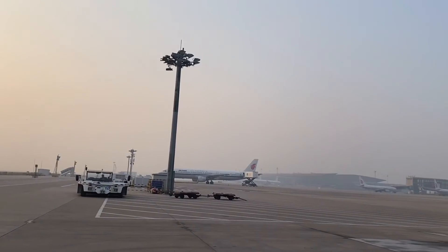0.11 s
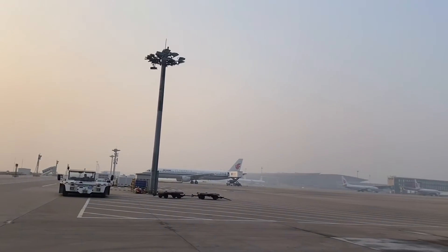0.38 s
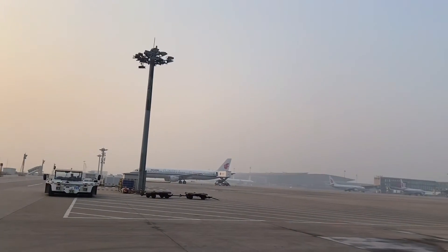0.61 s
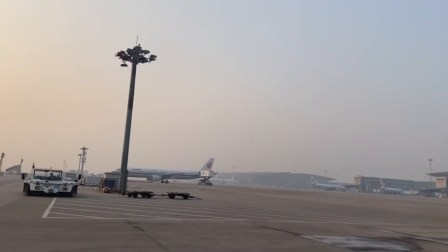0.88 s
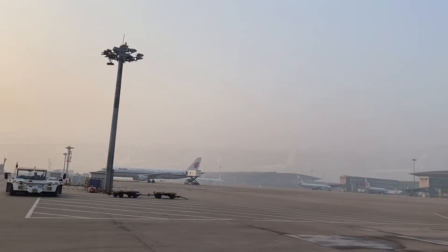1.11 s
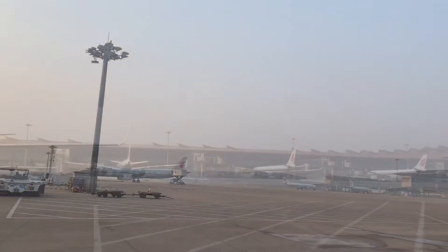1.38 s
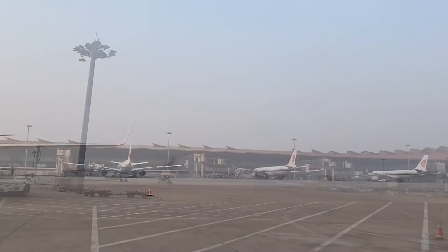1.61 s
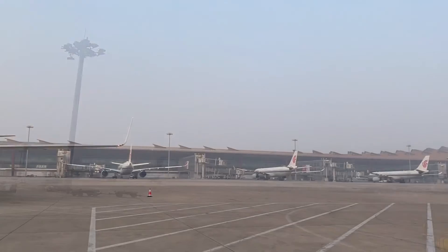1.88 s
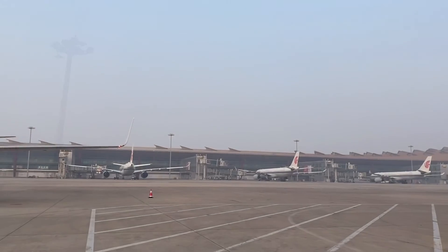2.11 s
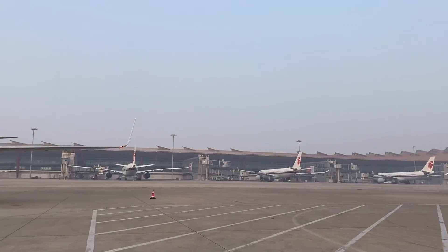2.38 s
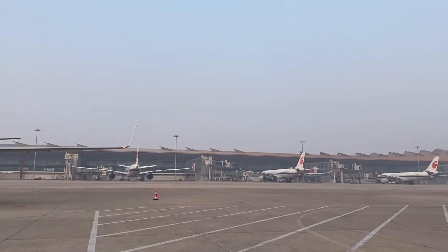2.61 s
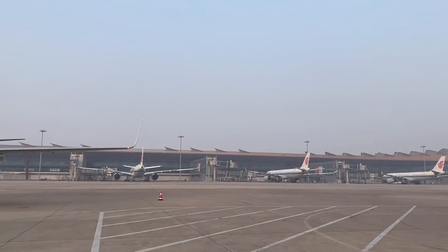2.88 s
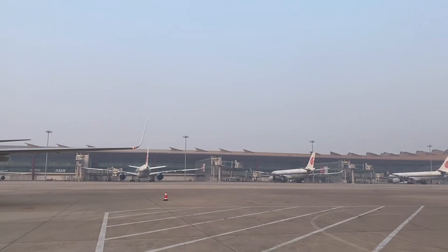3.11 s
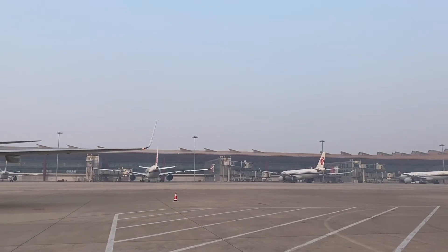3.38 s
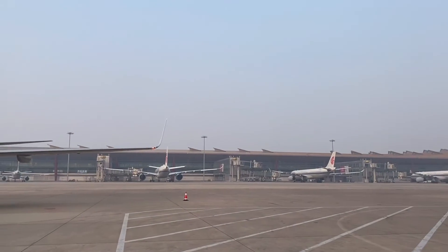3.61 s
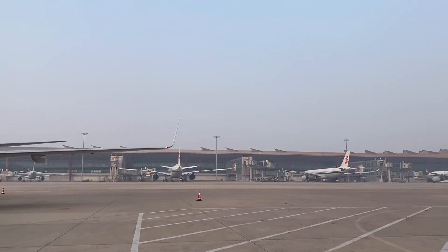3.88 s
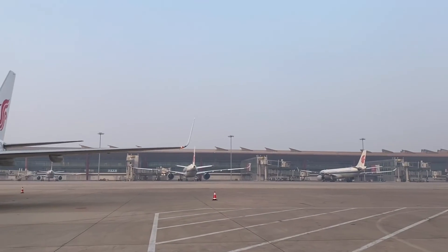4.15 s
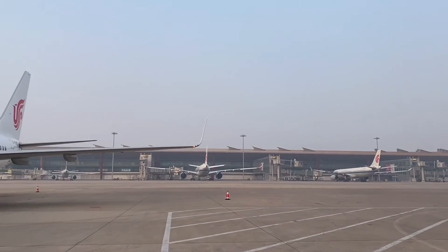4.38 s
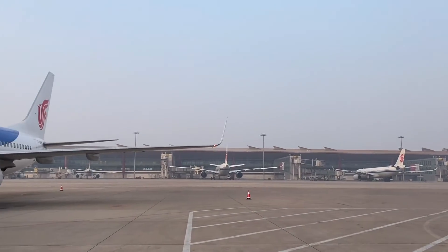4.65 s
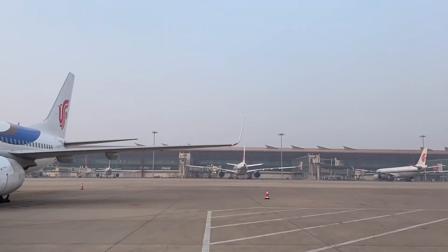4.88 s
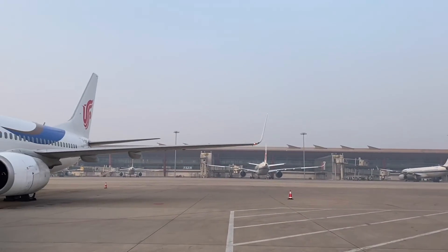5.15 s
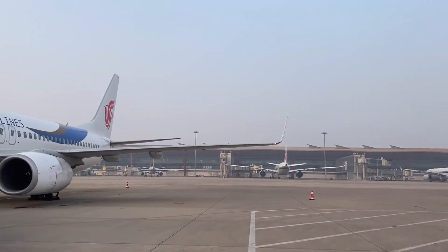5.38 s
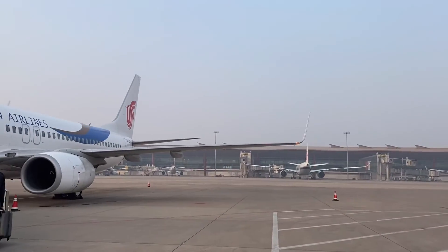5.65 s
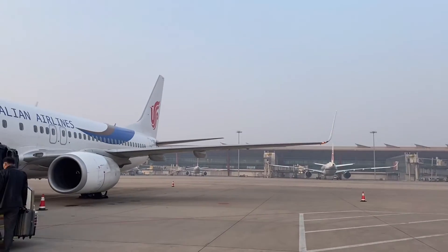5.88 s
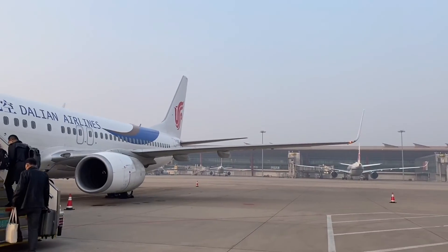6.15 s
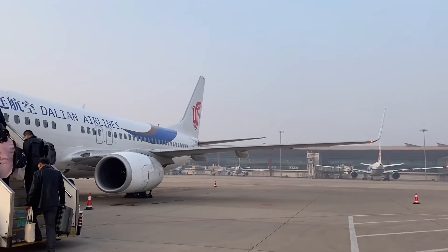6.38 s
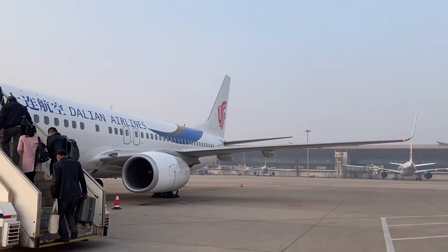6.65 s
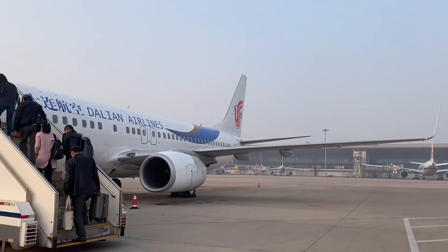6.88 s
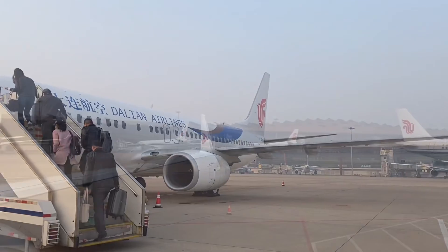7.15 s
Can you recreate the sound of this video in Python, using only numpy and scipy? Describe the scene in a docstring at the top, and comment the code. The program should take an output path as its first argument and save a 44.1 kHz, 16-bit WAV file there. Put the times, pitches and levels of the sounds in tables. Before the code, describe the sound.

From 0 s, already at full level, a wide stereo bed of low engine rumble and rough roar, with diesel knocks, a wavering mid-low hum that briefly dips, small low wind-like flutters and a weak pump whine. At about 1.1 s it cuts abruptly to near silence, then fades up until about 2.9 s: a smoother roar, low drone and clearer steady whine near 590 Hz, wavering in level, with thin high whistles. Bright tiny ticks of a hand on the phone come at 2.1 and 2.3 s, and a dull double thump at 3.1 s. Around 4 to 6 s a hissy jet band swells and glides slightly lower; faint ticks at 4.2 and 4.9 s. After 5 s the drone thins. Faint ticks and airy puffs follow at 6.3 and 6.6 s. At 6.9 s, a sudden drop to near silence, barely rising by 7.3 s.

```python
"""First a full rumble and roar of engines with an unsteady hum: an airport apron at dawn, from three spots in turn.
The roar is band-filtered noise, part shared by the ears and part opposed, with ringing notes and diesel knocks.
Sine tones give a pump with overtones, a turbine whistle with its octave, high ground power and low engine notes.
Enveloped noise and short sines give puffs, thumps, flutters and ticks of the hand on the phone.
The second and third spots cut in almost silent and fade up."""
import sys
import numpy as np
from scipy import signal
from scipy.fft import rfft, irfft
from scipy.io import wavfile
from scipy.ndimage import uniform_filter1d

SR = 44100
rng = np.random.default_rng(int(sys.argv[2]) if len(sys.argv) > 2 else 0)


def master_out(mix):
    """Clip the mix to full scale and print it as 16-bit PCM to the path in sys.argv[1]."""
    frames = np.transpose(np.atleast_2d(mix))
    ceiling = np.clip(frames, -1, 1)
    pcm = np.round(ceiling * 32767).astype(np.int16)
    wavfile.write(sys.argv[1], SR, pcm)


def how_loud(loudness_db):
    """Turn decibels into a plain amplitude multiplier (0 dB gives 1, 20 dB gives 10)."""
    steps = np.asarray(loudness_db, float) / 20
    return 10 ** steps


N = 320166
T = np.arange(N) / SR
F = np.fft.rfftfreq(N, 1 / SR)
EAR_SIGNS = np.array([[1], [-1]])  # left, right

# Levels hold before the fade at each spot. Every "length" of a swell, dip, puff, flutter or thump, and every
# swell's width, is two standard deviations of a Gaussian; a puff's width is that of a resonance.

# where one spot ends and the next begins: [t/s]
SPOT_CUTS_S = [1.0885, 6.918]
# bands of the roar, from rumble up to air: [lower f/Hz, upper f/Hz]
BAND_HZ = [
    [30, 180],
    [180, 550],
    [640, 1000],
    [1000, 2000],
    [2000, 3100],
    [3100, 4600],
    [4600, 7500],
    [9600, 12500],
]
# relative colour of the roar shared by both ears, first spot then later: [f/Hz, density/dB per Hz]
SHARED_COLOUR = [
    [(15, -48), (25, -35), (40, -10), (54, -6.5), (123, -2.5), (279, -12.5), (370, -16), (431, -17),
     (500, -25), (848, -32.5), (1550, -34), (2640, -31), (3500, -35), (4590, -32), (8000, -50.5),
     (12000, -57.5), (16000, -63)],
    [(15, -40), (25, -25), (36, -22), (47, -5.5), (92, -4), (199, -7.5), (373, -8), (500, -13),
     (800, -18.5), (1550, -27.5), (2830, -29), (4380, -38), (6500, -51), (8000, -53), (12000, -51),
     (16000, -54)],
]
# relative colour of the roar opposed in the ears, first spot then later: [f/Hz, density/dB per Hz]
OPPOSED_COLOUR = [
    [(15, -45), (48, -13), (123, -8), (300, -7.5), (442, -11.5), (576, -10), (868, -22.5), (1310, -19),
     (2000, -25), (2830, -42), (3700, -28), (4600, -38), (6500, -41), (16000, -74)],
    [(15, -33), (40, -10), (88, -11), (194, -9.5), (300, -6), (600, -5.5), (1000, -15), (1750, -15.5),
     (2170, -25), (3000, -24), (4400, -36.5), (5570, -38.5), (6500, -60), (16000, -82)],
]
# offset added to the opposed colour, first spot then later: [level/dB]
OPPOSED_OFFSET_DB = [-6, -8]
# balance of the roar, first spot then later: [f/Hz, left minus right/dB]
EAR_BALANCE = [
    [(60, -2), (110, 0.5), (200, -3.5), (380, 2.5), (700, -4), (1290, -1.5), (2380, -2), (4400, 0),
     (8120, -1), (15000, 0.0)],
    [(60, 3), (110, -0.5), (200, 3), (380, 2), (700, 7.5), (1290, -0.5), (2380, 2), (4400, 3), (8120, 0),
     (15000, 3)],
]
# phase between the ears, as the roar reaches one port first, first spot then later: [f/Hz, left leads/rad]
EAR_LEAD = [
    [(250, 0.0069), (360, 1.8), (500, 0.5), (750, .5), (1200, -0.26), (1900, -0.58), (2500, 0.21)],
    [(140, 0.04), (230, .35), (300, 0.56), (400, -0.37), (520, -0.21), (750, -1.2), (1200, 0.36),
     (2200, -0.011)],
]
# low engine notes, noise ringing in ducts, first spot then later: [f/Hz, width/Hz, level against the roar/dB]
DUCT_NOTES = [
    [(66, 31, 8), (113, 38, 4.5), (134, 25, -4), (382, 9.6, -1), (416, 16, -6)],
    [(68, 8.4, 0), (101, 8, 7.5), (137.3, 6.5, -2.5), (259.4, 6.1, 4), (371.8, 6.8, 2.5)],
]
# casings ringing in the roar, first spot then later: [f/Hz, width/Hz, level against the roar/dB, before knocking]
CASINGS = [
    [(1250, 220, 6), (1870, 190, -3), (2720, 130, 0), (4540, 330, -2)],
    [(739, 55, -0.5), (2750, 290, -9.5), (3400, 670, -7.5), (6480, 240, 0.5)],
]
# steady level at each spot: [rumble, drone, low roar, mid roar, roar, jet, hiss, air; level/dB]
ROAR_SPOT_DB = [(-25.5, -32, -46.5, -47, -45, -53, -54.5, -65),
                (-25.5, -31, -42.5, -47.5, -48, -52, -57, -75.5),
                (-30, -32, -42.5, -41.5, -45.5, -47.5, -57, -75)]
# engines near and far swell or sink over part of the roar: [t/s, length/s, f/Hz, width/octaves, level/dB]
ROAR_SWELLS = [(.1, 0.63, 70, 1.6, -5.5), (1.4, 0.88, 70, 0.98, -4), (1.516, 0.61, 2720, 1.2, 4.5),
               (2.0, 1.7, 11000, 1.5, 3.5), (2.387, 0.49, 1020, 2.5, 4), (2.402, 0.42, 5800, 0.57, 3),
               (2.698, 1.35, 1670, 1.55, 3.5), (2.846, 0.95, 2200, 3, 0), (3.507, 1, 70, 1.4, -1.5),
               (3.3, 0.73, 5840, 1.1, 0.5), (4.3, 0.24, 5000, 1.5, 2), (4.595, 1.05, 402, 2, 0.5),
               (5.25, 0.76, 159, 0.86, 4), (6.452, 1.9, 1020, 2.2, -1), (6.55, 0.38, 2600, 0.33, 2),
               (6.6, 0.67, 3800, 0.61, -1.5), (6.75, 1.6, 10000, 1.34, 6)]
# slow swell of the whole roar, first spot then later: [rms level/dB]
GUST_DB = [.3, .92]
# the jet swings past as the phone turns: [t/s, left leads/rad, opposed part of the jet/dB]
JET_TURN = [(0, .3, 5.5), (1.1, .3, 3.5), (1.2, 1.8, -7), (3.2, 1.5, -7), (4.2, 0.31, -3.5),
            (5.0, 0.088, -6), (5.6, .1, -9), (6.2, 0.36, -3), (7.26, .3, 1)]
# edges of the jet's band: [f/Hz]
JET_HZ = (2700, 5600)

# steady tones, fundamentals and overtones: [f/Hz]
TONE_HZ = [591.9, 1183.5, 1775.5, 2849.5, 5702, 10401, 10800, 11201, 11451, 11751, 12001]
# one row a tone: [whine (0 pump, 1 turbine whistle, 2 ground power, 3 whistle's octave),
# level against that whine/dB, left minus right/dB, left leads at first spot/rad, left leads later/rad]
TONE_EARS = [(0, 1, 3.5, -2.1, 2.0), (0, -24.5, -2.5, 3.5, 4), (0, -21, -6, 7, 2), (1, 7, -3, -2, -5.5),
             (3, 0.5, 11, 8, 1), (2, -16, 0, 0, 3), (2, -8, 1, 0, -3.5), (2, -3, 3, -2, 0),
             (2, -11, 2, 0, -5), (2, -18, 2, 0, 0), (2, -12, 0, 0, 0)]
# steady level at each spot: [pump, turbine whistle, ground power, whistle's octave; level/dB]
WHINE_SPOT_DB = [(-46, -70, -67, -76), (-36, -71, -86, -74), (-40, -75, -84, -78)]
# echoes off aircraft and buildings cancel the pump whine for a while: [t/s, length/s, level/dB]
PUMP_FADES = [(1.04, .15, -1), (1.3, 0.32, -7), (2.0, 0.41, -5.5), (2.42, 0.2, -9), (3.46, 0.17, -8.5),
              (4.15, 0.23, -3), (4.5, 0.26, -7), (5.173, 0.2, -8), (5.55, 0.26, -2.5), (6.35, 0.19, -2)]
# changes in level of the turbine whistle: [t/s, length/s, level/dB]
WHISTLE_SWELLS = [(2.9, .8, -4), (4.05, 0.092, 13), (4.6, 0.27, 7.5), (6.598, 0.24, 9), (6.86, 0.14, 13.5)]
# the high thin tones grow louder for a while: [t/s, length/s, level/dB]
HIGH_TONE_SWELLS = [(1.75, .25, 8), (2.1, .2, 15), (2.38, .15, 14), (2.81, .2, 14), (6.7, .5, 5)]
# the whistle's octave grows louder for a while: [t/s, length/s, level/dB]
OCTAVE_SWELLS = [(1.5, .16, 13), (1.8, 0.28, 13), (2.8, 0.93, 5), (6.4, 0.94, 9)]
# random wander of each whine, in the order of the whines above: [rms level/dB]
WAVER_DB = [.9, 3.2, 2.1, 3.2]
# quick pitch jitter of each whine: [rms share of its f]
PITCH_JITTER = [0, .0009, 0, .00025]

# the hum drops away briefly: [t/s, length/s, level/dB]
HUM_FADES = [(0, .05, -8), (.265, 0.08, -13), (.38, .04, -6), (.65, .025, -8), (.77, .03, -9),
             (.91, .1, -7)]
# short puffs of roar: [t/s, length/s, f/Hz, width/Hz, peak rms level/dB]
PUFFS = [(2.72, 0.17, 2500, 1500, -50), (4.63, .12, 2980, 1500, -54), (6.29, 0.079, 2800, 1200, -50),
         (6.64, 0.029, 2700, 1500, -43), (6.909, 0.0089, 700, 1200, -32.5)]
# dull thumps through the floor: [t/s, length/s, f/Hz, envelope peak level/dB]
THUMPS = [(3.052, .016, 100, -19), (3.146, .007, 135, -11)]
# low flutters, opposite in the two ears, maybe wind on the ports: [t/s, length/s, peak rms level/dB]
FLUTTERS = [(.05, .08, -31), (.52, .08, -31), (.7, .08, -41), (1.05, .06, -39)]
# hand on the phone: [t/s, envelope level/dB, decay by 60 dB/s, body f/Hz, body level against envelope/dB]
TICKS = [(2.085, -46, .02, 4000, -6), (2.0874, -33, 0.007, 4000, -3), (2.093, -52, .03, 4100, 13),
         (2.2982, -37, .01, 4000, -3), (2.3006, -29, 0.008, 2500, -6), (2.3025, -40, .01, 4600, -9),
         (2.307, -42, 0.015, 6800, -9), (2.3135, -37, 0.018, 2250, 0), (2.3205, -42, .015, 6000, -12),
         (4.164, -58, .03, 7800, 3), (4.865, -54, 0.05, 2250, 19), (4.871, -52, 0.04, 2200, 18),
         (4.882, -58, .05, 2900, 20), (6.269, -56, .04, 6000, 0), (6.633, -50, .05, 2950, 8)]

FIRING_HZ = 30.34
KNOCK_SHARE = 0.76, 0.22  # part of the casing ring that comes in knocks, first spot then later
KNOCK_CYCLES = .31  # decay to 1/e, as a part of the firing cycle
PASS_S, PASS_LENGTH_S = 4.92, 1.9  # middle and length of the jet's pass
PASS_HZ, PASS_GLIDE = 4040, -0.2  # f at the middle, octaves per s
PASS_WIDTH, PASS_DB = 0.43, 5  # octaves, dB
PUMP_SHARP, PUMP_SETTLE_S = .004, 1.6  # share of f at the start of the second spot, decay to 1/e
HUM_HZ, HUM_DB, HUM_WANDER_HZ, HUM_WAVER_DB, HUM_LEAD = 434, -37, 3.5, 1.4, -1.1  # lead: left, rad
DRONE_HZ, DRONE_DB, DRONE_LEAVES_S, DRONE_SINK_DB = 138, -35, 5.0, -4  # sinks in dB per s
FLUTTER_HZ, FLUTTER_WIDTH_HZ = 150, 260
FADE_S, FADE_POWER, FADE_FROM = 1.77, 1.162, 0.0033  # FADE_FROM is the floor before the power law
CUT_OUT_S = .0012  # very short fade that ends each of the first two spots
PORT_LAG_S, PORT_ALIKE_HZ, PORT_FROM_HZ = .000235, 6900, 6100  # the treble reaches the left port late
TOP_HZ = 15750


def roar(spot):
    """Diffuse field and forced resonance: shared and opposed noise, with casings knocked by diesel firings."""
    opposed_db = on_hz(OPPOSED_COLOUR[spot]) + OPPOSED_OFFSET_DB[spot]
    colour = how_loud(np.array([on_hz(SHARED_COLOUR[spot]), opposed_db]))
    cycles = np.cumsum(FIRING_HZ * (1 + 0.011 * walk(2.9))) / SR + rng.random()
    strength = how_loud(1.3 * rng.standard_normal(N // 500))[cycles.astype(int)]  # one draw a firing
    knock = strength * np.exp(-(cycles % 1) / KNOCK_CYCLES)
    knock = knock / np.sqrt(np.mean(knock ** 2))
    gate = 1 - KNOCK_SHARE[spot] + KNOCK_SHARE[spot] * knock
    casing_noise = irfft(rfft(rng.standard_normal((2, N))) * resonances(CASINGS[spot]), N)
    ringing = rfft(gate * casing_noise)
    ducts = rfft(rng.standard_normal((2, N))) * (1 + resonances(DUCT_NOTES[spot]))
    return (ducts + ringing) * colour


def apron(spot, level_db):
    """Interaural level and phase: the roar at both ears, each band at its own, slightly flickering level."""
    shared, opposed = roar(spot)
    balance = how_loud(on_hz(EAR_BALANCE[spot]) * EAR_SIGNS / 2)
    ear_gain = balance * np.exp(.5j * on_hz(EAR_LEAD[spot]) * EAR_SIGNS)
    jet = 1 / (1 + (JET_HZ[0] / (F + 1)) ** 8) / (1 + (F / JET_HZ[1]) ** 8)
    ears = (shared + opposed * (1 - jet) * EAR_SIGNS) * ear_gain
    s, lead, opposed_db = np.transpose(JET_TURN)
    turn_lead = np.tan(np.interp(T, s, lead) / 2)
    turn_opposed = how_loud(np.interp(T, s, opposed_db))
    # a quarter-cycle-early copy, added left and taken away right, lets the left ear lead
    jet_early = 1j * shared * jet * EAR_SIGNS * ear_gain
    jet_opposed = opposed * jet * EAR_SIGNS * ear_gain
    centres = np.log(np.sqrt(np.prod(BAND_HZ, axis=1)))
    gust, out = walk(4.352), 0
    for k, (lo, hi) in enumerate(BAND_HZ):
        # neighbouring bands cross-fade on a logarithmic frequency scale
        share = np.interp(np.log(F + 1), centres, np.arange(len(centres)) == k)
        band_db = level_db[k] + GUST_DB[spot] * gust + 0.47 * walk(15)
        gain = how_loud(band_db) / np.sqrt(power(ears.mean(0), lo, hi))
        early, apart = irfft(jet_early * share, N), irfft(jet_opposed * share, N)
        out = out + gain * (irfft(ears * share, N) + turn_lead * early + turn_opposed * apart)
    return out


def roar_db():
    """Superposition in decibels: each band's steady level plus the swells that reach it."""
    octave = np.log2(np.sqrt(np.prod(BAND_HZ, axis=1)))[:, None]
    level_db = by_spot(ROAR_SPOT_DB)
    for s, length, hz, width, db in ROAR_SWELLS:
        reach = np.exp(-.5 * ((octave - np.log2(hz)) / (width / 2)) ** 2)
        level_db = level_db + db * bump(s, length) * reach
    return level_db


def scatter(x, patchy_db):
    """Scattering: moving air makes patches of pitch and time uneven; the passing jet lifts a sliding hump."""
    hz, s, cells = signal.stft(x, SR, nperseg=1024)
    patches = rng.standard_normal(cells.shape[1:])
    patches = uniform_filter1d(uniform_filter1d(patches, size=3, axis=0), size=5, axis=1)
    octaves_off = np.log2((hz[:, None] + 1) / PASS_HZ) - PASS_GLIDE * (s - PASS_S)
    closeness = 2 * (octaves_off / PASS_WIDTH) ** 2 + 2 * ((s - PASS_S) / PASS_LENGTH_S) ** 2
    hump_db = PASS_DB * np.exp(-closeness)
    gain = how_loud(patchy_db * (patches / patches.std()) + hump_db)
    return signal.istft(cells * gain, SR, nperseg=1024)[1][:, :N]


def whines():
    """Periodic radiation: steady machine tones, each with its own phase and level between the ears."""
    level_db, out = whine_db(), 0
    age = T - SPOT_CUTS_S[0]
    sharp = (age > 0) * PUMP_SHARP * np.exp(-age / PUMP_SETTLE_S)
    for hz, (which, db, balance_db, lead_first, lead_later) in zip(TONE_HZ, TONE_EARS):
        half_lead = np.where(T < SPOT_CUTS_S[0], lead_first, lead_later) / 2
        pitch = hz * (1 + (which == 0) * sharp + PITCH_JITTER[which] * walk(30)) + .3 * walk(2.86)
        phase = 2 * np.pi * (np.cumsum(pitch) / SR + rng.random())
        left = how_loud(balance_db / 2) * np.exp(1j * half_lead)
        right = how_loud(-balance_db / 2) * np.exp(-1j * half_lead)
        # the level is that of the mean of both ears
        size = np.sqrt(2) * how_loud(level_db[which] + db + 0.12 * walk(17)) / np.abs((left + right) / 2)
        out = out + size * np.imag(np.array([left, right]) * np.exp(1j * phase))
    return out


def whine_db():
    """Slow amplitude modulation: a steady level per spot, with fades, swells and a random waver."""
    changes = PUMP_FADES, WHISTLE_SWELLS, HIGH_TONE_SWELLS, OCTAVE_SWELLS
    wavering = by_spot(WHINE_SPOT_DB) + np.array([db * walk(8) for db in WAVER_DB])
    return wavering + [sum(db * bump(s, length) for s, length, db in rows) for rows in changes]


def hum():
    """Frequency and amplitude modulation: a slightly unsteady engine note, at the first spot only."""
    phase = 2 * np.pi * np.cumsum(HUM_HZ + HUM_WANDER_HZ * walk(15.8)) / SR
    fades_db = sum(db * bump(s, length) for s, length, db in HUM_FADES)
    size = np.sqrt(2) * how_loud(HUM_DB + HUM_WAVER_DB * walk(23) + fades_db)
    ears = np.sin(phase + HUM_LEAD / 2 * EAR_SIGNS) / np.cos(HUM_LEAD / 2)
    return (T < SPOT_CUTS_S[0]) * size * ears


def drone():
    """Near-pure tone, alike in both ears: an engine note of the later spots that thins as it falls behind."""
    db = DRONE_DB + 1.5 * walk(5) + DRONE_SINK_DB * np.clip(T - DRONE_LEAVES_S, 0, None)
    phase = 2 * np.pi * np.cumsum(DRONE_HZ + walk(3)) / SR
    return (T > SPOT_CUTS_S[0]) * np.sqrt(2) * how_loud(db) * np.sin(phase)


def puffs():
    """Band-limited noise under a Gaussian envelope: brief swells around one pitch."""
    noise, out = rfft(rng.standard_normal(N)), 0
    for s, length, hz, width, db in PUFFS:
        band = irfft(noise * resonances([(hz, width, 0)]), N)
        out = out + how_loud(db) * band / band.std() * bump(s, length)
    return out


def thumps():
    """Strongly damped oscillation: a pull and a push of air, hardly more than one cycle."""
    out = 0
    for s, length, hz, db in THUMPS:
        out = out - how_loud(db) * bump(s, length) * np.cos(2 * np.pi * hz * (T - s) + 1)
    return out


def flutters():
    """Antiphase pressure: short low puffs that push one port and pull the other."""
    band = resonances([(FLUTTER_HZ, FLUTTER_WIDTH_HZ, 0)]) * (F > 50)
    low = irfft(rfft(rng.standard_normal(N)) * band, N)
    envelope = sum(how_loud(db) * bump(s, length) for s, length, db in FLUTTERS)
    return low / low.std() * envelope * EAR_SIGNS


def ticks():
    """Impact and free decay: short bright crackles on the phone's shell, each with a body note."""
    band = signal.butter(1, [3300, 14000], "band", fs=SR, output="sos")
    bright = signal.sosfilt(band, rng.standard_normal(N))
    out = 0
    for s, db, t60, hz, body_db in TICKS:
        age = np.clip(T - s, 0, 1)
        envelope = how_loud(db) * (1 - np.exp(-age / 0.0002)) * np.exp(-np.log(1000) * age / t60)
        out = out + envelope * (bright + how_loud(body_db) * np.sin(2 * np.pi * hz * age))
    return out


def resonances(table):
    """Resonance: summed gain of a few peaks at every frequency."""
    return sum(how_loud(db) / np.sqrt(1 + ((F - hz) / (width / 2)) ** 4) for hz, width, db in table)


def on_hz(points):
    """Spectral interpolation: a table read at every frequency on a logarithmic scale."""
    hz, value = np.transpose(points)
    return np.interp(np.log(F + 1), np.log(hz), value)


def power(spectrum, lo, hi):
    """Parseval's theorem: the mean square that a spectrum holds between two frequencies."""
    return 2 * np.sum(np.abs(spectrum[(F >= lo) & (F < hi)]) ** 2) / N ** 2


def walk(rate):
    """Smoothed random process: values held 1 / rate s and averaged twice; spread near 1."""
    k = int(SR / rate)
    held = np.repeat(rng.standard_normal(N // k + 1), k)
    return 1.29 * uniform_filter1d(uniform_filter1d(held, k), k)[:N]


def bump(s, length):
    """Gaussian envelope: a smooth rise and fall in time, peak 1."""
    return np.exp(-.5 * ((T - s) / (length / 2)) ** 2)


def by_spot(table):
    """Piecewise-constant levels: per-spot values that jump at the cuts."""
    return np.transpose(table)[:, np.searchsorted(SPOT_CUTS_S, T)].astype(float)


def scene():
    """Superposition of all sources: three spots in turn, the later two fading up from near silence."""
    level_db = roar_db()
    spot = np.searchsorted(SPOT_CUTS_S, T)
    age = T - np.array([-FADE_S, *SPOT_CUTS_S])[spot]  # the first spot starts already faded up
    fade = np.clip(age / FADE_S, FADE_FROM, 1) ** FADE_POWER
    left_s = np.array([*SPOT_CUTS_S, N])[spot] - T  # N is far off: the last spot has no ending fade
    fade = fade * np.clip(left_s / CUT_OUT_S, 0, 1)
    noise = np.where(T < SPOT_CUTS_S[0], apron(0, level_db), apron(1, level_db))
    noise = scatter(noise, patchy_db=1.5)
    return fade * (noise + puffs() + thumps() + whines() + hum() + flutters() + drone()) + ticks()


def band_limit(x):
    """A steep low-pass at the top of the band."""
    return signal.sosfilt(signal.butter(12, 16800, fs=SR, output="sos"), x)


def record(dry):
    """Interport delay: in the treble both ports hear one sound, the left a little late; the top is cut."""
    padded = N + 4096
    hz = np.fft.rfftfreq(padded, 1 / SR)
    ears = rfft(dry, padded)
    lag = np.exp(-1j * np.pi * (hz - PORT_ALIKE_HZ) * PORT_LAG_S * EAR_SIGNS)
    treble = 1 / (1 + (PORT_FROM_HZ / (hz + 1)) ** 16)
    common = ears.mean(0) * (1 - treble + treble * lag)
    side = (ears[0] - ears[1]) / 2 * EAR_SIGNS / (1 + (hz / 9000) ** 8)
    mix = (common + side) / (1 + (hz / TOP_HZ) ** 80)
    return band_limit(irfft(mix, padded)[:, :N])


dry = scene()
out = record(dry)
master_out(out)
```